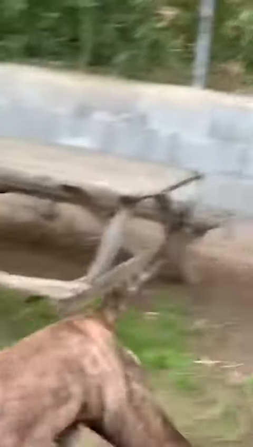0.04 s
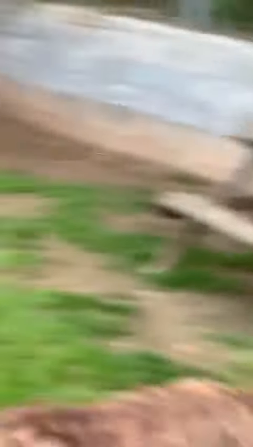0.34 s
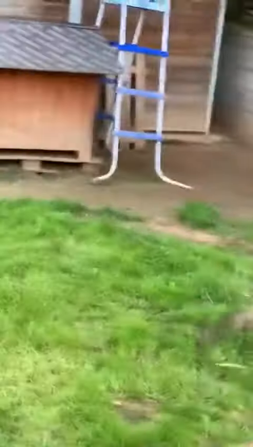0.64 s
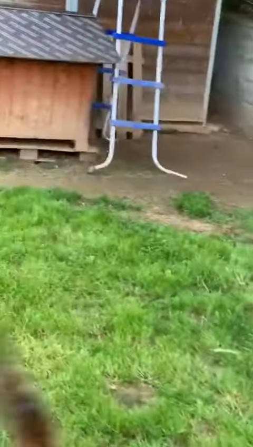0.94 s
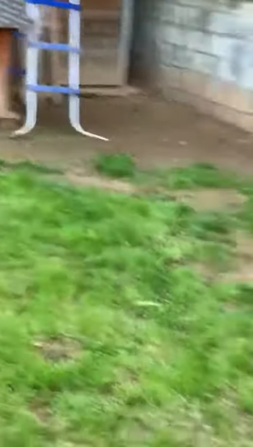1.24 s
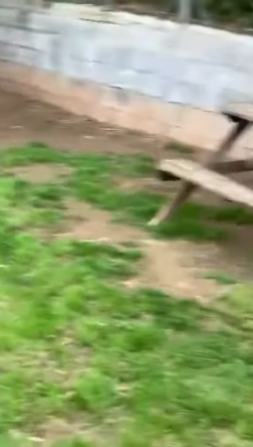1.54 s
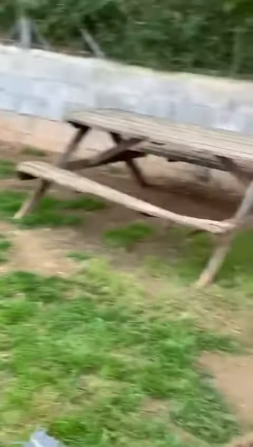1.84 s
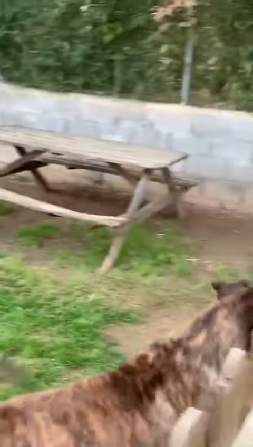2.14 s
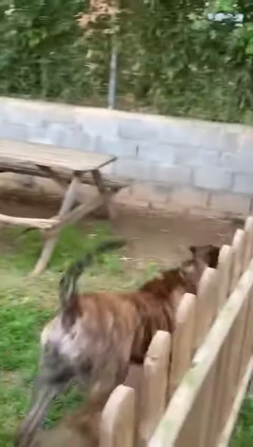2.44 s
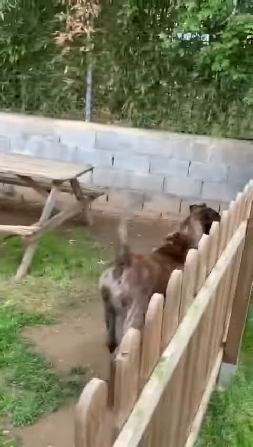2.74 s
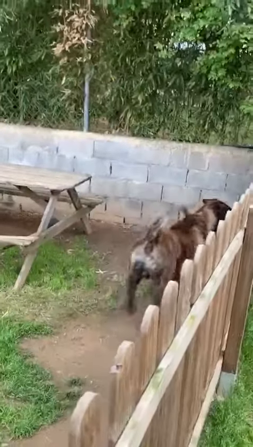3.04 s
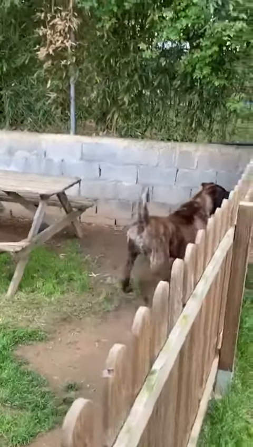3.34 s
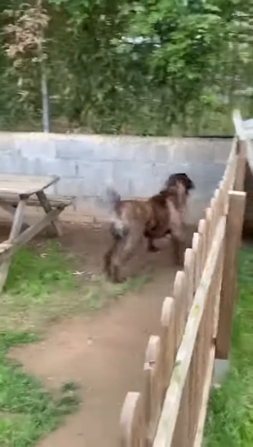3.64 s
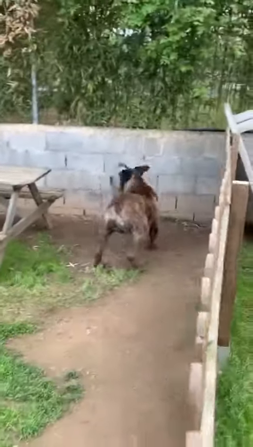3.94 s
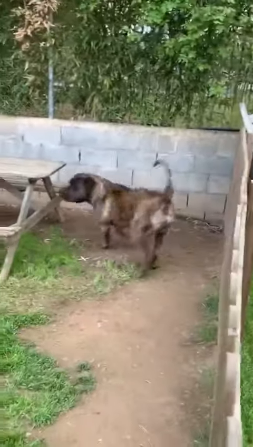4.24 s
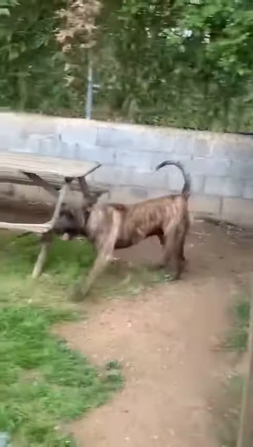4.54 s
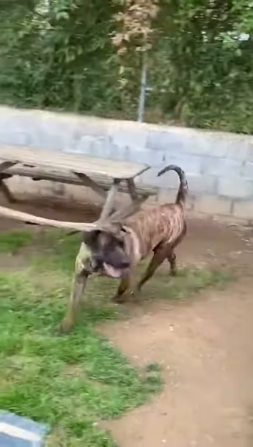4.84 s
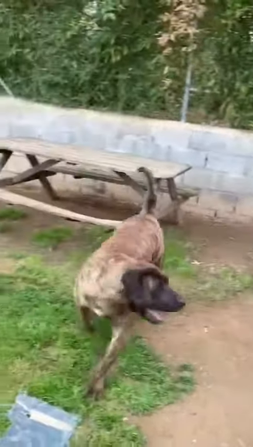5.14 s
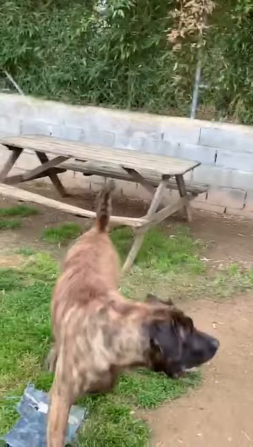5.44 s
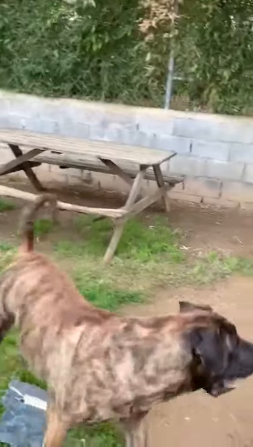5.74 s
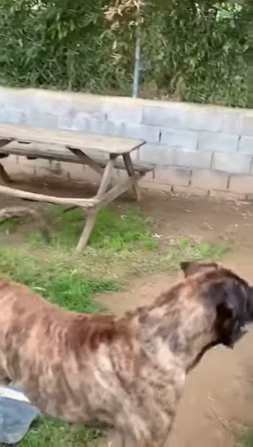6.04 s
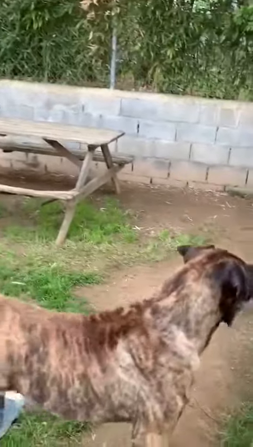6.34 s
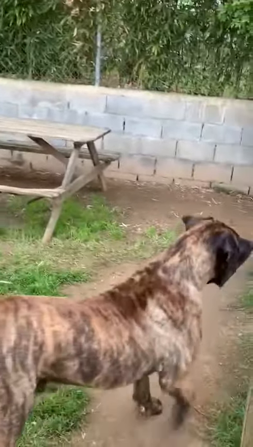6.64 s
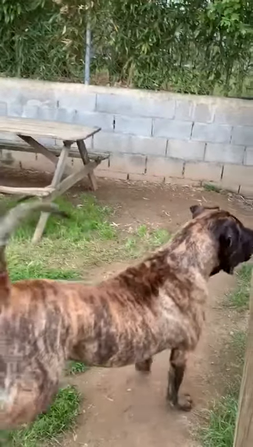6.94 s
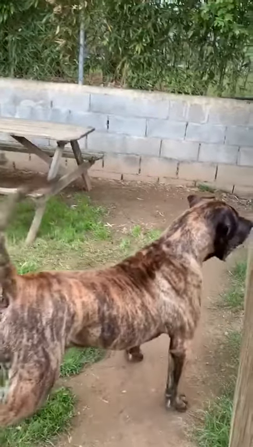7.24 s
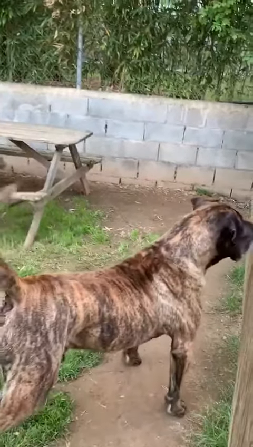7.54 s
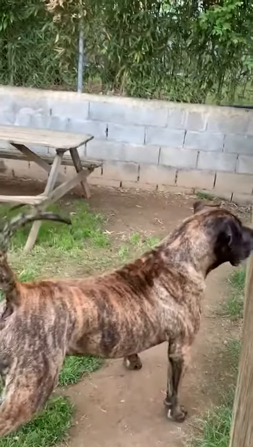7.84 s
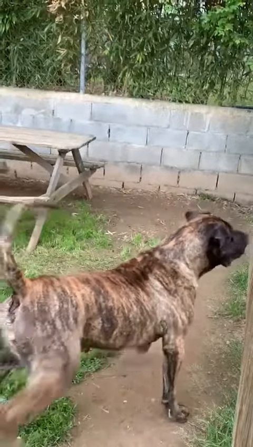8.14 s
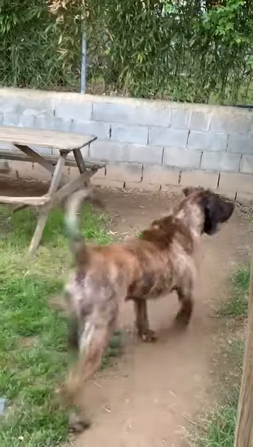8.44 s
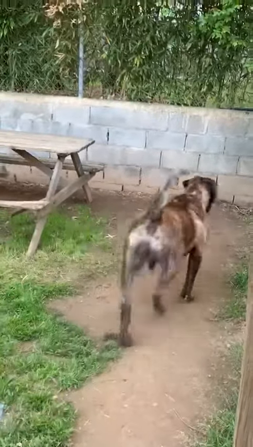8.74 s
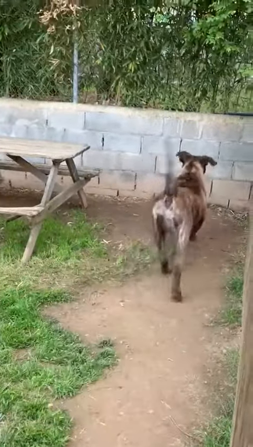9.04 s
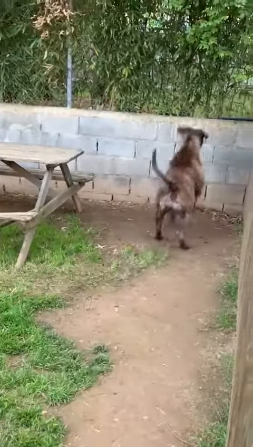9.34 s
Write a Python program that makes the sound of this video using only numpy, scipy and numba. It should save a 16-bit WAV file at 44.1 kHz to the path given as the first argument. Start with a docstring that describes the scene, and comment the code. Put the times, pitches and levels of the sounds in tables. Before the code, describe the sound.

Hoarse, raspy barks and wheezy breaths come from a big dog running about outdoors, with one snort and faint bird whistles.

```python
"""In a walled yard, a large dog runs about giving hoarse, nearly voiceless barks, with wheezing gasps
between them. Its slack vocal folds chop the air into uneven puffs that make its throat and mouth ring,
and once it snorts with flapping jowls. Paws scuff and thud on the dirt, a grainy, crackling hiss comes
and goes, and a small bird whistles from the hedge. The nearby sounds spread wide to left and right."""
import sys
import numpy as np
from scipy import signal
from scipy.fft import rfft, irfft, next_fast_len
from scipy.io import wavfile
from scipy.ndimage import uniform_filter1d
from numba import njit

SR = 44100
rng = np.random.default_rng(int(sys.argv[2]) if len(sys.argv) > 2 else 0)


def store_pcm(level_fs):
    """Save levels as 16-bit WAV."""
    pcm = np.round(np.clip(level_fs, -1, 1) * 32767).astype(np.int16)
    wavfile.write(sys.argv[1], SR, np.atleast_2d(pcm).T)


N = 422919
TIME = np.arange(N) / SR
FREQS = np.fft.rfftfreq(N, 1 / SR) + 1e-3

# How loud the background is: t/s, open air level/dB, low drone level/dB
BACKGROUND_LEVELS = [(0, -90, -42), (1.6, -63, -57.5), (4.5, -61.5, -64), (7.3, -70.5, -68),
                     (7.6, -72.5, -78), (9.6, -62, -64.5)]
# Tone of the open air, from bass to treble: f/Hz, relative level/dB
AIR_TONE = [(20, -20.5), (55, 1), (80, -5), (130, -5), (400, -12), (800, -12.5), (1800, -24.5),
            (3500, -52.5), (7000, -57.5), (12000, -70.5)]
# Bird whistles: t/s, length/s, start f/Hz, end f/Hz, relative level/dB,
# bend (1 is a straight slide, more settles early), quiver (share of the pitch)
BIRD_NOTES = [(6.098, 0.09, 3760, 3670, -38.5, 6.6, 0.0041), (6.201, 0.041, 3590, 2700, -41.5, 1.7, 0.018),
              (7.158, .016, 3800, 5520, -35, 1.4, 0.028), (7.24, 0.016, 3880, 4550, -55, 1.1, .02),
              (7.29, .026, 3400, 5800, -37.5, 1.2, 0.029), (7.377, 0.0495, 4620, 4860, -47.5, 1.12, 0.045),
              (7.493, 0.05, 4670, 5300, -46.5, 0.91, 0.021), (7.934, 0.2, 6490, 5900, -53, 3.7, 0.02),
              (8.282, 0.065, 5250, 5110, -45.5, 0.94, 0.018), (8.417, 0.3, 5520, 3967, -49, 4.8, 0.0074)]
# Course of the bird's twitter: t/s, relative level/dB, centre f/Hz
TWITTER_PATH = [(7.12, -51, 4800), (7.42, -48.5, 4740), (7.57, -62.5, 5220), (7.63, -46, 5920),
                (7.8, -41, 6300), (7.95, -55, 6400), (8.2, -49.5, 6360)]
# Tone of the high hiss, both in the breath and on its own: f/Hz, relative level/dB
HISS_TONE = [(300, -45.5), (1500, 20), (2800, 12), (4200, 17.5), (5200, 2.5), (6500, 12.5), (8200, 10),
             (9500, 3.5), (10600, -2.5), (11300, -1)]
# Grainy, crackling high hiss that dips just before some barks and the snort: t/s, level/dB
HISS_LEVELS = [(0, -45), (.24, -41.5), (.33, -51), (.44, -47), (.465, -59), (.5, -39.5), (.66, -49),
               (1.02, -77), (1.4, -68.5), (1.78, -62), (2.15, -53.5), (2.3, -59.5), (3.6, -64.5),
               (3.85, -57.5), (3.925, -65), (4.0, -48.5), (4.3, -50.5), (4.45, -64), (5.9, -63.5),
               (6.55, -72), (7.05, -63), (7.3, -69.5), (7.95, -69.5), (8.2, -64.5), (8.5, -67.5),
               (8.75, -60.5), (9.58, -64.5)]
# Soft thuds of the paws: t/s, peak level/dB, f/Hz, length/s
PAW_THUDS = [(0.117, -33, 74.3, 0.063), (0.199, -42, 45, 0.098), (0.307, -37, 140.6, 0.032),
             (0.384, -37, 70.2, 0.031), (1.684, -39, 71.1, 0.044), (1.769, -40, 67.2, 0.06),
             (1.859, -37.5, 68, 0.065), (2.659, -36.5, 76.4, 0.045), (2.792, -35, 58.8, 0.081),
             (2.964, -45, 61.4, 0.1), (3.258, -41, 92.3, 0.022), (4.043, -38, 56.4, 0.1),
             (4.645, -52.5, 145.7, 0.11), (5.047, -30, 71.8, 0.031), (6.014, -44, 80, 0.04),
             (6.665, -57, 180, 0.022), (6.905, -52.5, 70, 0.026), (8.186, -49, 105.2, 0.089),
             (8.707, -50.5, 154.2, 0.08), (9.124, -48.5, 148, 0.1), (9.544, -40, 107, 0.033)]
# Paw scuffs and smacks of the jaws: t/s, relative level/dB, strongest f/Hz, fade time/s
SCUFFS_AND_SMACKS = [(0.038, -30, 6400, 0.015), (0.249, -20, 2270, 0.01), (.325, -22.5, 505, 0.019),
                     (1, -53.5, 7760, 0.023), (1.747, -44.5, 8000, 0.027), (2.226, -50, 930, 0.0073),
                     (4.407, -49, 9200, 0.0096), (4.784, -36.5, 7250, 0.036), (5.012, -46, 7140, 0.024),
                     (5.399, -43.5, 8900, 0.04), (5.438, -44, 1300, 0.005), (5.944, -36, 2180, 0.023),
                     (6.307, -49, 8400, 0.052), (6.658, -41, 1490, 0.019), (7.331, -49.5, 8000, 0.014),
                     (8.256, -44.5, 9000, 0.08)]
# Course of the snort: t/s, rushing air level/dB, flapping jowls level/dB
SNORT_LEVELS = [(3.925, -75, -77), (3.952, -33.5, -48), (4.0, -34, -35), (4.125, -47.5, -33.5),
                (4.19, -46, -30), (4.235, -44, -35.5), (4.27, -42.5, -44.5), (4.335, -43.5, -50),
                (4.385, -53, -58), (4.42, -67, -58)]
# Resonances of the nose (the pitches at which it rings): f/Hz, width/Hz, relative level/dB
NOSE_RESONANCES = [(463, 780, -1), (794, 420, 4.5), (1180, 160, 4.5), (1596, 390, -6.5), (2095, 120, 0),
                   (3090, 120, -11.5), (3670, 340, -16.5)]
# Breaths in: t/s, rise/s, fall/s, level/dB, wheeze f/Hz, mouth relative level/dB, main mouth f/Hz
GASP_BREATHS = [(0, 0.027, .03, -42, 660, -3.5, 1690), (.27, 0.19, .02, -36, 840, -3.5, 1460),
                (.728, 0.063, 0.066, -39, 915, -13.5, 1770), (.88, .06, 0.057, -52.5, 650, -20, 1780),
                (2.207, 0.19, 0.11, -47, 595, -13, 1700), (2.606, .06, 0.076, -45, 633, -13.5, 1740),
                (3.1, 0.12, 0.11, -47, 688, -14, 1710), (3.676, 0.18, 0.085, -44.5, 623, -6, 1660),
                (4.44, 0.23, 0.022, -45, 770, -6.5, 1700), (4.853, 0.18, 0.032, -47, 650, -7.5, 1700),
                (5.255, 0.22, 0.045, -46, 930, -12, 1550), (5.775, 0.15, 0.12, -49, 795, -12.5, 1570),
                (6.7, 0.081, 0.043, -52, 617, -26, 1720), (8.44, 0.17, 0.055, -44, 640, -17.5, 1615),
                (8.89, 0.17, 0.043, -49, 850, -1, 1620), (9.34, 0.019, 0.22, -57, 727, -2.5, 1700)]
# Brief sung notes within barks, gasps and the snort: t/s, length/s, f/Hz, peak level/dB
YELP_NOTES = [(0.113, 0.039, 1264, -21), (0.529, 0.012, 886, -13.5), (1.248, 0.03, 615, -25),
              (2.229, 0.018, 920, -34.5), (4.986, 0.0096, 668, -32), (4.065, .055, 1466, -41.5),
              (4.252, 0.065, 1606, -38), (4.307, 0.03, 1230, -32.5), (4.447, 0.015, 1470, -45),
              (4.671, .025, 1684, -31.5), (8.166, 0.021, 589, -26)]
# One bark a row: t/s, rise/s, fall/s, level/dB, swell to the peak/dB, throat relative level/dB,
# share by which jaw and tongue pitches start low, jaw f/Hz, tongue f/Hz, tongue relative level/dB,
# palate (roof of the mouth) f/Hz, cheek f/Hz, lip f/Hz, relative level of these three together/dB,
# cheek against palate/dB, lip against palate/dB, teeth hiss relative level/dB, jaw left minus right/dB
BARK_SHAPES = [(.076, .05, .085, -28, 6.895, -8, .06, 710, 907, 3.5, 1273, 1640, 2160, -9.5, -20, -5.5, -14.5, 1),
               (.472, .058, .075, -25.5, 6.99, -4, .03, 824, 1006, 0, 1362, 1846, 2100, -4, -8.5, -7.5, -19, 0.5),
               (1.094, .15, .05, -33, 1.987, 4, .04, 632, 970, -3, 1368, 1844, 2376, -11.5, -7, -7, -25.5, 0.5),
               (1.914, .115, .115, -29.5, 7, -2, .08, 808, 1080, -0.5, 1326, 1820, 2200, -10, -8.5, -8.5, -25.5, 5.5),
               (2.419, .06, .05, -29.5, 6.11, -13, .06, 688, 781, -2.5, 1320, 1775, 2025, -8, -11, -11, -19, 8),
               (2.87, .115, .035, -33, 9, -14.5, .12, 734, 862, -5, 1400, 1854, 2080, -9, -10, -10, -24, 7.5),
               (3.417, .11, .065, -35, 9, -20.5, .08, 733, 850, -2.5, 1294, 1760, 1917, -10.5, -4.5, -10, -22, 6),
               (4.638, .03, .075, -27.5, 0.87, -17, .03, 686, 844, 4, 1395, 1703, 2250, -9, 4, -9, -17, 3),
               (5.068, .105, .03, -33.5, 3.057, -9.5, .04, 674, 1060, 1.5, 1307, 1748, 2220, -11.5, -6, -9, -24, 2),
               (5.526, .075, .1, -32.5, 4, 0.5, .03, 663, 926, 6, 1276, 1749, 2300, -11, -3, -10.5, -26.5, 3),
               (6.106, .225, .045, -40, 1, 3, .02, 648, 866, 6.5, 1065, 1806, 2220, -15.5, -8, -3.5, -54, 2.5),
               (6.908, .135, .1, -37, 7, -2, .08, 600.4, 816, -2.5, 1342, 1850, 2110, -12, -4, -7.5, -23.5, 4.5),
               (8.093, .11, .085, -30.5, 8.5, -12, 0.26, 635, 980, -7.5, 1343, 1753, 2160, -9, -3, -7.5, -22.5, 4.5),
               (8.653, .06, .11, -37.5, 7, -9, .12, 682, 858, 6.5, 1305, 1793, 2320, -7.5, -3, -10.5, -30, 6),
               (9.104, .04, .08, -37, 2.4, -6.5, .03, 721, 1000, 0.5, 1293, 1764, 2200, -3.5, -5, -16, -16, 5.5)]
# Left-right phase difference at each pitch, which spreads nearby sounds wide: f/Hz, phase/rad
LEFT_RIGHT_PHASE = [(130, .2), (400, .95), (900, 1.55), (1200, 1.2), (1500, 1.5), (1850, -1.2),
                    (2400, -1.2), (2800, -1.7), (3800, -1.8), (5000, -2.75), (6500, -.4), (7150, 0),
                    (8400, 1.57), (9100, 2.9), (10300, 3.3), (11000, 4.9), (12000, 6.2)]


def undb(db):
    """Turn decibels into a number to multiply by."""
    return 10 ** (np.asarray(db) / 20)


def unit(x):
    """Scale a signal so that its average strength (rms) is 1."""
    return x / np.sqrt(np.mean(x ** 2))


def steady(x):
    """Hold the strength near 1 from moment to moment, keeping the fast grain."""
    return x / np.sqrt(uniform_filter1d(x ** 2, size=1300) + 1e-12)


def noise():
    """White noise: all pitches equally strong."""
    return rng.standard_normal(N)


def wobble(hz):
    """A random curve of size about 1 that takes a new turn hz times a second."""
    return unit(np.interp(TIME * hz, np.arange(4000), rng.standard_normal(4000)))


def curves(table):
    """A gate that is open while the table runs, then each column joined by straight lines."""
    times, *columns = np.transpose(table)
    gate = (TIME >= times[0]) & (TIME < times[-1])
    return [uniform_filter1d(gate * 1., size=500)] + [np.interp(TIME, times, c) for c in columns]


def held(table):
    """Time since the latest row began, then that row's values, held until the next row."""
    starts, *columns = np.transpose(table)
    row = (np.searchsorted(starts, TIME) - 1).clip(0)
    return [TIME - starts[row]] + [uniform_filter1d(c[row], size=200) for c in columns]


def over_frequency(points):
    """Join (frequency, value) points, giving each octave the same room."""
    hz, value = np.transpose(points)
    return np.interp(np.log(FREQS), np.log(hz), value)


def shape(x, gain):
    """Filter a sound with one gain for each of FREQS."""
    size = next_fast_len(N)
    gain = np.interp(np.fft.rfftfreq(size, 1 / SR), FREQS, gain)
    return irfft(rfft(x, size) * gain, size)[..., :N]


def let_through(x, kind, hz, order=2):
    """Keep the low part, the high part or a band; a higher order cuts more steeply."""
    return signal.sosfilt(signal.butter(order, hz, kind, fs=SR, output="sos"), x)


@njit
def moving_band(x, hz, width_hz):
    """Keep the pitches around a centre that can move (a state-variable filter)."""
    y, band, low = np.empty(len(x)), 0., 0.
    for i in range(len(x)):
        tuning, damping = np.tan(np.pi * hz[i] / SR), width_hz / hz[i]
        swing = (band + tuning * (x[i] - low)) / (1 + tuning * (tuning + damping))
        band, low = 2 * swing - band, low + 2 * tuning * swing
        y[i] = damping * swing
    return y


def ring(x, hz, width_hz):
    """A resonance: pitches near hz pass and the rest fall away steeply."""
    hz = np.minimum(hz, .45 * SR) * np.ones(len(x))
    return moving_band(moving_band(x, hz, float(width_hz)), hz, float(width_hz))


def add(out, start_s, x):
    """Mix in a short sound at start_s."""
    i = int(start_s * SR)
    out[i:i + len(x)] += x[:N - i]


def pan(x, db):
    """Make a sound db louder on the left than on the right."""
    return x * undb(np.array([db * np.ones(N), -db * np.ones(N)]) / 2)


def delayed(x, lag_s):
    """The same sound, lag_s later."""
    return np.interp(TIME - lag_s, TIME, x, left=0)


def scatter(x, fade_s):
    """Echoes off fence, wall and hedge die by 60 dB in fade_s; their bass is alike on both sides."""
    t = np.arange(SR // 2) / SR
    mid, side = rng.standard_normal((2, len(t))) * undb(-60 * t / fade_s) * (t > .003)
    side = let_through(side, "high", hz=400)
    tail = np.array([mid + side, mid - side]) / np.sqrt(2 * np.sum(mid ** 2))
    return signal.fftconvolve(x[None], tail, axes=1)[:, :N]


def widen(x):
    """Put left and right out of step at each pitch, so the sound spreads wide."""
    turn = np.exp(.5j * over_frequency(LEFT_RIGHT_PHASE))
    return np.array([shape(x[0], turn), shape(x[1], turn.conj())])


def open_air():
    """Faint outdoor air, and a far, low drone that fades over the first seconds."""
    _, air_db, drone_db = curves(BACKGROUND_LEVELS)
    tone = undb(over_frequency(AIR_TONE))
    centre = unit(shape(noise(), tone))
    wide = unit(shape(np.array([noise(), noise()]), tone))
    drone = unit(ring(noise(), 65.5, 25)) + undb(-5) * unit(ring(noise(), 310, 570))
    return undb(air_db + wobble(2.4)) * (centre + undb(-1) * wide) + undb(drone_db) * drone


def whistles():
    """The bird's thin, quivering notes, each swelling as it slides to its last pitch."""
    attack_s, release_s, swell_db = .0019, .007, 6.5
    out = np.zeros(N)
    for start, length, start_hz, end_hz, db, bend, quiver in BIRD_NOTES:
        progress = np.linspace(0, 1, int(length * SR))
        slide_left = (1 - progress) ** bend
        hz = (end_hz + (start_hz - end_hz) * slide_left) * (1 + quiver * wobble(274.5)[:len(progress)])
        gate = np.minimum(progress * length / attack_s, (1 - progress) * length / release_s).clip(0, 1)
        level = undb(db - swell_db * slide_left + 5.2 * wobble(67.7)[:len(progress)])
        add(out, start, gate * level * np.sin(2 * np.pi * np.cumsum(hz) / SR))
    return out


def twitter():
    """A quick, uneven run of tiny rising chirps."""
    chirps_per_s, rise_share = 80, .4
    gate, db, centre_hz = curves(TWITTER_PATH)
    progress = np.cumsum(chirps_per_s * np.exp(.33 * wobble(30))) / SR % 1
    hz = centre_hz * (1 + rise_share * (progress - .5) + .034 * wobble(60))
    level = gate * undb(db + 1.9 * wobble(49)) * np.sin(np.pi * progress) ** 2
    return level * np.sin(2 * np.pi * np.cumsum(hz) / SR)


def bird():
    """The song comes from further off, bounced by the wall and scattered by the hedge."""
    song = whistles()
    song = song + undb(-6) * delayed(song, lag_s=.018)
    leaves = undb(-13) * scatter(song, fade_s=.12)
    far_echo = scatter(song, fade_s=.65)
    return leaves + undb(-12) * (song + far_echo + scatter(twitter(), fade_s=.12))


def hiss():
    """A grainy, high hiss; each band flickers on its own."""
    edges_hz = np.geomspace(1000, 12000, 9)
    tone = undb(over_frequency(HISS_TONE))
    bands = [shape(noise(), tone * (FREQS >= low) * (FREQS < high)) * undb(3 * wobble(22))
             for low, high in zip(edges_hz, edges_hz[1:])]
    return unit(sum(bands) * undb(1.6 * wobble(250)))


def crackling_hiss():
    """A high hiss dotted with tiny snaps; it dips just before some barks and the snort."""
    snaps_per_s, snap_fade_s = 26, .0015
    _, db = curves(HISS_LEVELS)
    snaps = (rng.random(N) < snaps_per_s / SR) * noise()
    burst = rng.standard_normal(400) * np.exp(-np.arange(400) / SR / snap_fade_s)
    crackle = unit(shape(signal.fftconvolve(snaps, burst)[:N], undb(over_frequency(HISS_TONE))))
    return undb(db + .5 * wobble(23)) * (hiss() + undb(-15) * crackle)


def thuds():
    """The dog's weight lands on soft ground in short, low swells."""
    out, t = np.zeros(N), np.arange(SR // 2) / SR
    for start, db, hz, length in PAW_THUDS:
        rumble = unit(ring(rng.standard_normal(SR), hz, .695 * hz))[-len(t):]
        swing = np.cos(np.angle(signal.hilbert(rumble)))  # the rumble at an even strength
        swell = (2 * t / length) * np.exp(1 - 2 * t / length)
        add(out, start, undb(db) * swing * swell)
    return let_through(out, "low", hz=260, order=4)


def scuffs():
    """Scraping paws and smacking jaws make short, gritty bursts."""
    out, t = np.zeros(N), np.arange(SR // 2) / SR
    for start, db, hz, fade_s in SCUFFS_AND_SMACKS:
        grains = rng.standard_normal(len(t)) * undb(2.3 * wobble(300)[:len(t)])
        grit = unit(ring(grains, hz, 1.8 * hz))
        burst = np.exp(-t / fade_s) * (1 - np.exp(-t / (.15 * fade_s)))
        add(out, start, undb(db - 9) * grit * burst)
    return out


def yard_echoes(x):
    """Echoes from the yard, its far wall and, later, beyond it; grass and hedge swallow the treble."""
    dull = let_through(x, "low", hz=3360)
    late = let_through(delayed(x, lag_s=.19), "band", hz=[350, 2200])
    near = undb(-5) * scatter(dull, fade_s=.11)
    wall = undb(-16.5) * scatter(delayed(dull, lag_s=.035), fade_s=.22)
    return near + wall + undb(-23.5) * scatter(late, fade_s=.43)


def rasp(hz, jitter, air, flutter_db):
    """Slack folds slap unevenly, each time with a puff of air; soft flesh makes the flow flutter."""
    cycles = np.cumsum(hz * np.exp(jitter * wobble(np.mean(hz)))) / SR
    slaps = np.diff(np.floor(cycles), prepend=0)
    puffs = noise() * (.2 + np.exp(-(cycles % 1) / .9))
    return (unit(slaps) + air * unit(puffs)) * undb(flutter_db * wobble(90))


def push(age, rise_s, fall_s, swell_db, attack_s, sag_db, release_db_per_s):
    """Level in dB of one push of air, 0 at its peak: it catches, swells, sags and is let go."""
    onset_db, roundness = 17.5, 1.7  # a roundness of 1 gives a pointed peak
    attack = onset_db * (1 - age / attack_s).clip(0)
    swell = swell_db * ((rise_s - age) / (rise_s - attack_s).clip(.005)).clip(0, 1) ** roundness
    sag = sag_db * ((age - rise_s) / fall_s).clip(0, 1) ** roundness
    release = release_db_per_s * (age - rise_s - fall_s).clip(0)
    return uniform_filter1d(-attack - swell - sag - release, size=130)


def cavity(resonances):
    """A hollow's neighbouring resonances swing opposite ways, leaving quiet gaps between them."""
    return steady(sum((-1) ** k * ringing for k, ringing in enumerate(resonances)))


def snort():
    """Air rushes through the working nostrils while the jowls flap in a low, throbbing growl."""
    gate, air_db, jowl_db = curves(SNORT_LEVELS)
    flaps = rasp(hz=137, jitter=.071, air=.6, flutter_db=2)
    throb = 1 + .5 * np.sin(2 * np.pi * 21 * TIME)
    jowls = throb * steady(ring(flaps, 173, 55) + undb(-13.5) * ring(flaps, 280, 65))
    air = rasp(hz=150, jitter=.1, air=1.2, flutter_db=3)
    nose = cavity(undb(db + 4 * wobble(25)) * ring(air, hz * (1 + .07 * wobble(14)), width)
                  for hz, width, db in NOSE_RESONANCES)
    rush = nose + undb(-18) * hiss()
    return gate * (pan(undb(jowl_db) * jowls, -2.1) + pan(undb(air_db) * rush, .87))


def gasps():
    """Air drawn in through a narrow throat wheezes, and stops as the next bark is readied."""
    shut_s, shut_db = .021, 18
    age, rise_s, fall_s, db, wheeze_hz, mouth_db, mouth_hz = held(GASP_BREATHS)
    bark_age = held(BARK_SHAPES)[0]
    breathing_in = uniform_filter1d((age < bark_age) * 1., size=400)
    shut = sum(np.exp(-np.minimum(abs(TIME - bark[0]) / shut_s, 10) ** 2) for bark in BARK_SHAPES)
    effort_db = push(age, rise_s, fall_s, swell_db=10, attack_s=.01, sag_db=14.5, release_db_per_s=139)
    air = noise() * undb(2.8 * (wobble(37) + wobble(113)))
    main_ring = ring(air, wheeze_hz * (1 + .045 * wobble(22)), 85)
    wheeze = steady(main_ring + undb(-7.5) * ring(air, 862, 200) + undb(-11) * ring(air, 564, 200))
    sway = 1 + .066 * wobble(12)
    resonances = [(.64 * mouth_hz, 300, 0), (mouth_hz, 330, 4), (2350, 2700, -24)]
    mouth = cavity(undb(ring_db) * ring(air, hz * sway, width) for hz, width, ring_db in resonances)
    breath = pan(wheeze, 2.2) + undb(mouth_db) * mouth + undb(-24.5) * hiss()
    return breathing_in * undb(db + effort_db - shut_db * shut) * breath


def yelps():
    """For an instant the vocal folds catch and sing one unsteady note."""
    out = np.zeros(N)
    for start, length, hz, db in YELP_NOTES:
        progress = np.linspace(0, 1, int(length * SR))
        cycles = np.cumsum(hz * (1 + .04 * wobble(260)[:len(progress)])) / SR
        level = undb(db + 2 * wobble(270)[:len(progress)])
        arch = np.sin(np.pi * progress ** .85) ** .91
        add(out, start, level * arch * np.sin(2 * np.pi * cycles))
    return out


def open_mouth(puffs, palate_hz, cheek_hz, lip_hz, cheek_db, lip_db):
    """Palate, cheeks, lips and teeth ring, each wavering in pitch and strength on its own."""
    resonances = [(palate_hz, 200, 0), (cheek_hz, 220, cheek_db),
                  (lip_hz, 330, lip_db), (3040, 450, lip_db - 12.5)]
    ringing = cavity(undb(db + 2 * wobble(35)) * unit(ring(puffs, hz * (1 + .031 * wobble(15)), width))
                     for hz, width, db in resonances)
    return ringing + undb(-22.5) * unit(ring(puffs, 2200, 3600))


def barks():
    """Hoarse blasts: the mouth rings brighter as the jaws open, and the throat booms as they close."""
    slap_hz, throb_hz = 128.96, 42
    (age, rise_s, fall_s, db, swell_db, throat_db, start_low, jaw_hz, tongue_hz, tongue_db,
     palate_hz, cheek_hz, lip_hz, mouth_db, cheek_db, lip_db, hiss_db, side_db) = held(BARK_SHAPES)
    effort_db = push(age, rise_s, fall_s, swell_db, attack_s=.023, sag_db=9, release_db_per_s=200)
    still_shut = (1 - age / rise_s).clip(0, 1)
    closing = ((age - rise_s) / fall_s).clip(0, 1)
    mouth_db = mouth_db - 7.5 * still_shut
    throat_db = throat_db + 5 * (closing - .5)
    opening = (1 - start_low * still_shut) * (1 - .07 * closing ** 2)  # narrower jaws ring lower
    folds_hz = slap_hz * np.exp(.012 * effort_db.clip(-20))  # more effort, faster slaps
    folds = rasp(folds_hz, jitter=.14, air=.65, flutter_db=2)
    puffs = let_through(folds, "high", hz=280, order=4)
    sway = 1 + .041 * wobble(18)
    jaw = unit(ring(puffs, jaw_hz * opening * sway, 160))
    tongue = undb(tongue_db) * unit(ring(puffs, tongue_hz * opening * sway, 170))
    throat = undb(throat_db) * unit(ring(puffs, 385 * sway, 110))
    body = pan(jaw + tongue, side_db) + pan(throat, -1.2)
    body = body / np.sqrt(uniform_filter1d(np.mean(body ** 2, axis=0), size=900))  # even out its level
    mouth = open_mouth(puffs, palate_hz, cheek_hz, lip_hz, cheek_db, lip_db)
    voice = body + pan(undb(mouth_db) * mouth, -1.5) + undb(hiss_db) * hiss()
    throb = np.sin(2 * np.pi * np.cumsum(throb_hz * np.exp(.25 * wobble(25))) / SR)
    growl = 1 + .5 * undb(throat_db).clip(0, 1) * throb  # throaty barks throb the most
    shudder_db = 2 * wobble(59.23)  # uneven force within a bark
    return undb(db + effort_db + shudder_db) * growl * voice


def scene():
    """The dog close by with its echoes and footsteps, hiss and open air, and the bird further off."""
    dog = barks() + gasps() + yelps() + snort()
    echoes = yard_echoes(dog.mean(0))
    birdsong = bird()
    return widen(dog + echoes + crackling_hiss() + thuds() + scuffs() + open_air()) + birdsong


def record(dry):
    """The highest treble is cut off steeply."""
    top_hz = 12000
    return signal.sosfilt(signal.ellip(8, .2, 70, top_hz, fs=SR, output="sos"), dry)


dry = scene()
out = record(dry)
store_pcm(out)
```